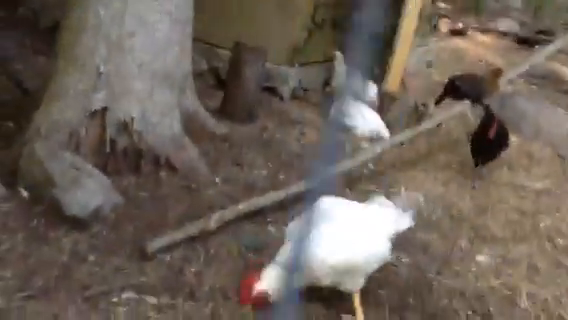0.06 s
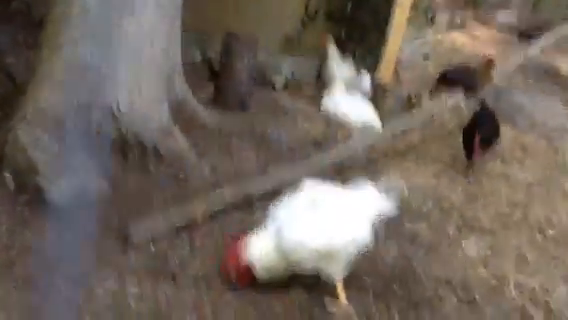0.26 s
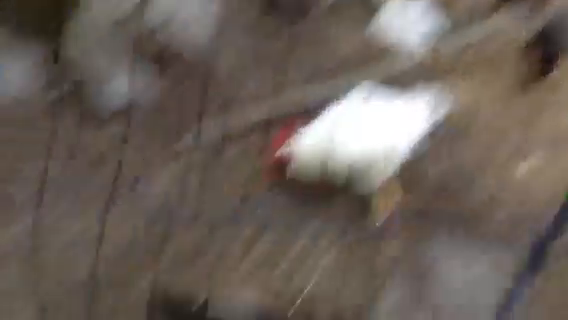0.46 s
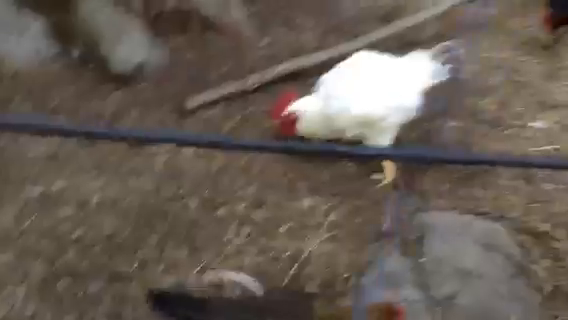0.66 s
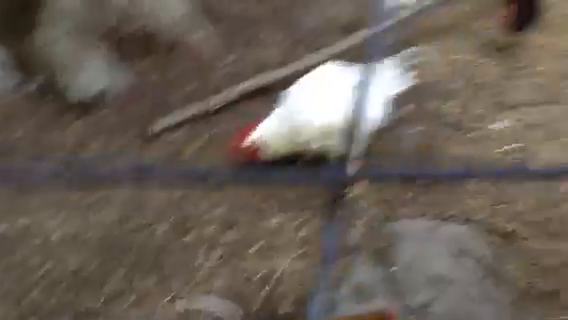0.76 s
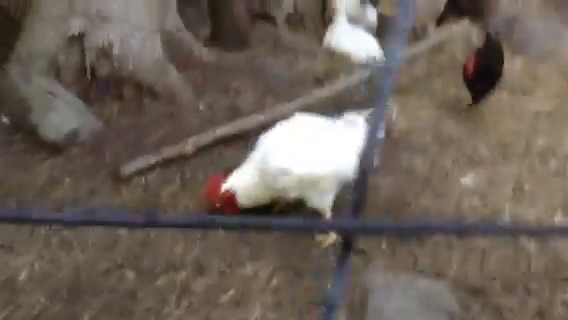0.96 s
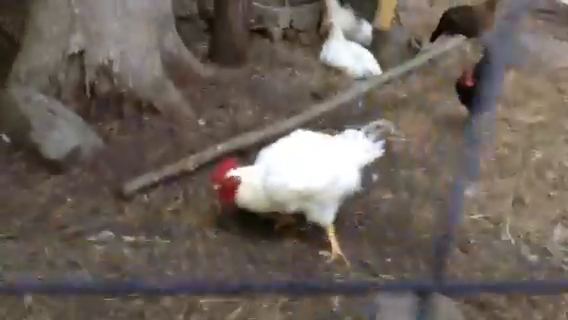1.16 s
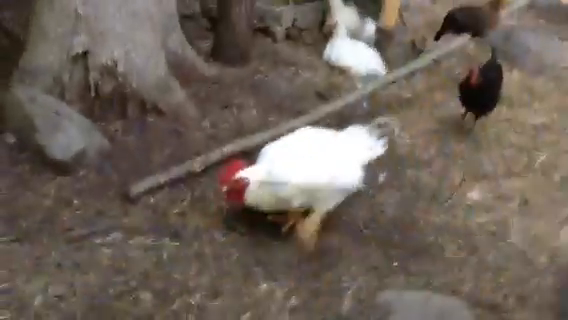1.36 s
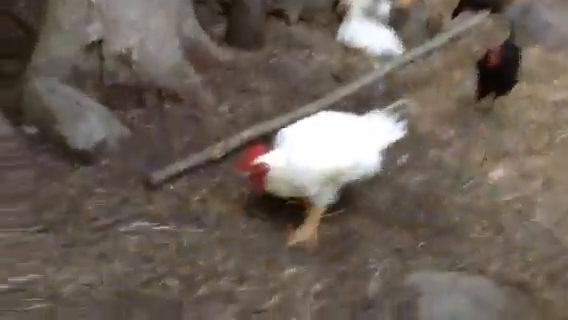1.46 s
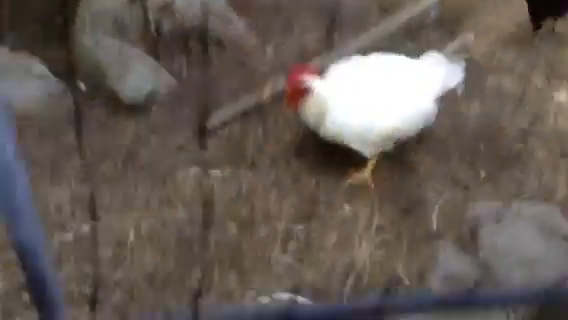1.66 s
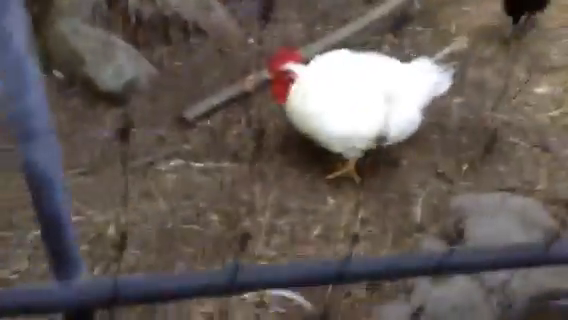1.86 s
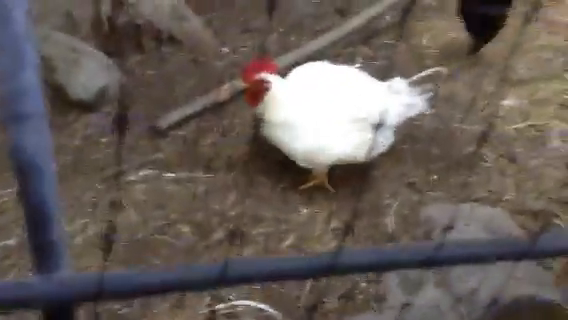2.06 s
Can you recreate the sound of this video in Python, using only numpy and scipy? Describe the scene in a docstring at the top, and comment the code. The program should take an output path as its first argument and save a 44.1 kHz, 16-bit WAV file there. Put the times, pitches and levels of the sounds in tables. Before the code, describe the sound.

Hens give short scattered clucks while feet scratch and rustle dry litter in a quiet yard

```python
"""Hens in an outdoor run: short clucks, loud and faint, are gliding sines with an octave, sometimes the
stronger, and a weak fourth partial; pulsed mouth resonances harden one onset. Feet scratching dry litter
are clumped grains over smooth noise, with ringing straw breaks; grit ticks as decaying band noise, twigs
and pecks as ringing clicks. A faint rough insect is narrow noise, a cricket's brief trill a wavering high
tone; coloured noise makes the quiet air of the yard, a noise-driven low resonance its wavering rumble."""
import sys
import numpy as np
from scipy import signal
from scipy.fft import rfft, irfft
from scipy.io import wavfile

SR = 44100
rng = np.random.default_rng(int(sys.argv[2]) if len(sys.argv) > 2 else 0)


def int16_out(signal):
    """Quantize to a 16-bit WAV file."""
    q = np.round(np.clip(np.atleast_2d(signal).T, -1, 1) * 32767)
    wavfile.write(sys.argv[1], SR, q.astype(np.int16))


def ratio(d):
    """dB to gain"""
    e = np.asarray(d, float) / 20
    return 10 ** e


N = 92610   # samples, 2.1 s

# Colour of the yard's air, relative density per hertz: [f/Hz, level/dB]
AIR_SPECTRUM = [(15, -58), (25, -27), (255, -2), (425, -2), (461, -2), (1280, -12), (3880, -12.5),
                (4820, -15.5), (6310, -16), (13400, -17), (15800, -17)]
# Course of the low rumble: [t/s, level/dB]
RUMBLE_LEVELS = [(0.0, -72), (0.18, -79), (0.33, -82), (0.6, -68), (1.33, -76), (1.45, -60.5),
                 (1.73, -65.5), (1.88, -71.5), (2.1, -62)]
# Swells of the litter rustle: [t/s, treble level/dB, upper-middle level/dB, middle level/dB]
RUSTLE_LEVELS = [(0.0, -65, -66, -66.5), (0.11, -60, -62, -61), (0.149, -49, -49, -52),
                 (0.26, -52.5, -60.5, -65), (0.3, -54, -56, -61.5), (0.33, -49, -63, -56.5),
                 (0.34, -53, -61, -61), (0.45, -52, -58.5, -57.5), (0.53, -54.5, -58.5, -62),
                 (0.54, -54, -63, -48), (0.55, -58, -61, -59.5), (0.58, -49.5, -55.5, -62),
                 (0.62, -47.5, -54, -63), (0.81, -64, -64, -66), (0.92, -54.5, -60, -72),
                 (0.949, -47, -56, -58), (0.959, -40.5, -47.5, -50), (0.978, -47, -49, -65.5),
                 (1.018, -39, -45.5, -49), (1.05, -47.5, -54.5, -57), (1.09, -48.5, -53, -62.5),
                 (1.12, -56, -61.5, -64.5), (1.4, -56.5, -62, -60), (1.56, -60, -57.5, -69.5),
                 (1.58, -53.5, -58.5, -61.5), (1.73, -67, -70.5, -69.5), (2.01, -72, -76, -66.5),
                 (2.1, -56, -60, -64)]
# Colours of the three rustle ranges, relative density per hertz: [f/Hz, level/dB]
TREBLE_SPECTRUM = [(6000, -22), (8000, -12), (10000, -3), (13000, 2), (15500, -2)]
UPPER_SPECTRUM = [(2800, -5.5), (4000, -1), (6000, -1), (8000, 0), (10500, -5.5)]
MIDDLE_SPECTRUM = [(250, -5), (500, -0.5), (1000, -1), (2000, -2), (3600, -8.5), (5500, -46)]
# Ticks of grit, peak levels before the band trim:
# [t/s, treble level/dB, upper-middle level/dB, middle level/dB, t60/s]
GRIT_TICKS = [(0.0812, -39, -64, -58, 0.013), (0.153, -50, -59, -52, 0.0084), (0.208, -47, -43, -61, 0.012),
              (0.2345, -32, -59, -44, 0.0084), (0.2798, -32, -61, -45, 0.0079),
              (0.3231, -25.5, -50, -38.5, 0.019), (0.372, -40, -60, -57, 0.0065),
              (0.4442, -32.5, -55, -52, 0.009), (0.4646, -48, -58, -40, 0.023),
              (0.6535, -31, -59, -46, 0.017), (0.871, -39.5, -60, -69, 0.011),
              (0.9448, -27.5, -52, -46, 0.018), (0.9634, -31, -63, -63, 0.012),
              (0.9704, -32, -51, -55, 0.02), (1.0206, -30, -38.5, -56, 0.014), (1.04, -49, -57, -47, 0.011),
              (1.0844, -30, -46, -50, 0.0047), (1.1995, -42, -61, -62, 0.0069),
              (1.276, -37, -56, -67, 0.0098), (1.298, -46, -49, -64, 0.014),
              (1.3054, -42, -46.5, -59, 0.011), (1.376, -36.5, -53, -55, 0.032),
              (1.5713, -33.5, -61, -62, 0.016)]
# Pass bands of the grit ticks: [low f/Hz, high f/Hz, trim level/dB]
GRIT_BANDS = [(9400, 17700, -2), (4050, 19800, 7.5), (1000, 5700, -1)]
# Snaps of twigs and pecks: [t/s, peak level/dB, ring f/Hz, t60/s]
TWIG_SNAPS = [(.025, -45.5, 640, 0.018), (0.152, -40.5, 5070, 0.0056), (.25, -43.5, 1000, 0.011),
              (.324, -41.5, 3780, 0.0095), (0.2815, -21.5, 13200, 0.0029), (0.948, -42, 560, 0.023),
              (1.06, -32, 11900, 0.0018), (1.076, -31, 11700, 0.0022), (1.0885, -31, 14000, .002),
              (1.1265, -35, 10000, .002), (1.161, -43, 11000, .003), (1.2115, -39, 11200, .003),
              (1.2185, -36, 11100, .002), (1.2355, -37, 11800, .002), (1.25, -36, 12500, .002),
              (1.2535, -43, 9700, .003), (0.957, -39, 2930, 0.0047), (0.9634, -38, 5070, 0.0049),
              (0.9649, -31.5, 2770, 0.013), (.965, -46, 530, 0.02), (1.02, -43, 547, 0.034),
              (1.042, -48.5, 1500, 0.015), (1.218, -45, 6200, 0.0053), (1.226, -43.5, 890, 0.0036),
              (1.235, -42.5, 6200, 0.0066), (1.309, -39.5, 695, 0.0063), (1.435, -46.5, 1410, 0.012),
              (1.499, -44.5, 446, 0.0057), (1.5397, -39.5, 3340, 0.0053), (1.538, -41.5, 2500, 0.005),
              (1.446, -46.5, 1700, 0.013), (1.452, -47.5, 1390, 0.0085), (1.5722, -44.5, 3230, 0.011),
              (1.571, -40, 9070, 0.0087), (1.572, -42, 14200, .006), (1.571, -49, 11800, .005),
              (1.597, -38, 6200, 0.0025)]
# Glides of the clucks, before wobble and flutter; some clucks are two successive or overlapping glides:
# [t/s, fundamental f/Hz, fundamental level/dB, octave level/dB]
CLUCK_GLIDES = [
    [(.128, 287, -44, -71), (.132, 332, -39, -50), (.137, 421, -46.5, -60), (.144, 402, -51, -51),
     (.153, 430, -59, -52)],
    [(.16, 1350, -55, -80), (.165, 1293, -44, -54), (.169, 972, -35.5, -49), (.173, 572, -32, -61),
     (.1765, 452, -23.5, -42), (.179, 402, -26, -40), (.182, 352, -40, -42), (.186, 303, -68, -63),
     (.19, 415, -41, -41), (.197, 400, -59, -54), (.205, 380, -48, -58), (.216, 350, -56, -62)],
    [(.5362, 1040, -47, -62), (.5372, 1020, -53, -33.5), (.5385, 1036, -30.5, -37), (.5394, 1150, -22, -44),
     (.5402, 876, -39.5, -70), (.5409, 460, -37, -56), (.542, 299, -32, -36), (.544, 295, -37.5, -66),
     (.549, 224, -61, -40), (.552, 220, -70, -72)],
    [(.836, 520, -77, -80), (.84, 523, -46.5, -86), (.846, 517, -59, -80)],
    [(.888, 323, -56, -55), (.891, 312, -38, -45), (.896, 344, -32.5, -39), (.901, 405, -35, -60),
     (.905, 423, -40, -47), (.908, 360, -54, -42), (.912, 375, -41, -40), (.918, 450, -44, -68)],
    [(.91, 1110, -54, -83), (.915, 1225, -45, -80), (.922, 1342, -45.5, -77), (.928, 1220, -37.5, -67),
     (.932, 955, -40, -48), (.935, 616, -29, -56), (.9375, 567, -23, -52), (.941, 360, -33.5, -45),
     (.945, 332, -50, -55), (.95, 330, -79, -72)],
    [(1.161, 343, -76, -54), (1.166, 324, -73, -41), (1.171, 295, -63, -33), (1.174, 349, -39.5, -40),
     (1.177, 298, -47, -36), (1.18, 328, -61, -36), (1.186, 320, -44, -33.5), (1.192, 280, -52, -36.5),
     (1.195, 284, -58, -48), (1.204, 303, -62, -50)],
    [(1.168, 485, -55, -80), (1.178, 425, -47.5, -67), (1.194, 414, -45.5, -79)],
    [(1.955, 398, -65, -88), (1.97, 320, -59.5, -81), (1.982, 333, -54.5, -83), (1.996, 365, -61, -73)],
    [(2.078, 281, -53, -78), (2.088, 278, -57, -72), (2.1, 267, -45.5, -61)],
]
# Pulses at the onset of the sharp cluck: [t/s, level/dB]
BEAK_PULSES = [(.5366, -33), (.5376, -32)]
# Resonances of the short mouth, relative to the pulses: [f/Hz, level/dB, t60/s]
MOUTH_RESONANCES = [(2060, -9, 0.0037), (2930, -1.5, .003), (3680, -2, 0.0048), (6200, -7, 0.0014)]
# Notes of the cricket, levels before the waver: [start t/s, length t/s, level/dB]
CRICKET_NOTES = [(1.602, 0.045, -65), (1.64, 0.015, -61), (1.658, 0.028, -62), (1.684, 0.02, -56.5),
                 (1.708, .05, -65.5), (1.76, 0.074, -68), (1.85, 0.022, -66)]


def in_time(rows):
    """Linear interpolation: the columns of a timed curve at every sample."""
    s, *columns = np.transpose(rows)
    return [np.interp(np.arange(N) / SR, s, column) for column in columns]


def rms_one(x):
    """Normalization: a signal scaled to rms 1."""
    return x / np.sqrt(np.mean(x ** 2) + 1e-20)


def drift(rate_hz):
    """Random modulation: white noise through a two-pole low-pass, scaled to rms 1."""
    pole = np.exp(-2 * np.pi * rate_hz / SR)
    noise = rng.standard_normal(N + SR)
    slow = signal.lfilter([1], [1, -2 * pole, pole * pole], noise)
    return rms_one(slow[SR:])   # the first second lets the filter settle


def ring(clicks, hz, t60):
    """Damped resonance: a unit click starts a decaying sine of initial height 1."""
    r = ratio(-60 / (t60 * SR))
    w = 2 * np.pi * hz / SR
    return signal.lfilter([0, np.sin(w)], [1, -2 * r * np.cos(w), r * r], clicks)


def colour(x, spectrum):
    """Spectral shaping: a white signal weighted on a logarithmic frequency axis, then set to rms 1."""
    hz, db = np.transpose(spectrum)
    log_f = np.log(np.fft.rfftfreq(N, 1 / SR) + 1)
    return rms_one(irfft(rfft(x) * ratio(np.interp(log_f, np.log(hz), db)), N))


def yard_air():
    """Broadband ambient noise: a fixed colour whose level wavers slowly."""
    level_db = -59.5 + 0.46 * drift(7.5)
    return ratio(level_db) * colour(rng.standard_normal(N), AIR_SPECTRUM)


def low_rumble():
    """Noise-driven resonance: a damped low mode under a random, wavering level."""
    rumble_hz, swing_db, t60_s = 145, 3.5, 0.015
    level_db = in_time(RUMBLE_LEVELS)[0] + swing_db * drift(8.2)
    return ratio(level_db) * rms_one(ring(rng.standard_normal(N), rumble_hz, t60_s))


def litter():
    """Granular friction: random impulses and smooth noise clump together in three frequency ranges."""
    grains_per_s, grain_spread_db, smooth_share, clump_db = 3000, 4.5, 0.75, 2
    out, clump = 0, ratio(clump_db * drift(40))
    spectra = [TREBLE_SPECTRUM, UPPER_SPECTRUM, MIDDLE_SPECTRUM]
    for db, spectrum in zip(in_time(RUSTLE_LEVELS), spectra):
        sizes = ratio(grain_spread_db * np.minimum(rng.exponential(1, N), 5))
        signed = sizes * rng.choice([-1, 1], N)
        grains = rms_one(signed * (rng.random(N) < grains_per_s * clump / SR))
        swish = clump * rng.standard_normal(N)
        # the shares are of power
        source = np.sqrt(1 - smooth_share) * grains + np.sqrt(smooth_share) * swish
        out = out + ratio(db) * colour(source, spectrum)
    return out


def straw_crackle():
    """Random fracture: sparse straw breaks ring high and brief, under the treble rustle's swells."""
    crackles_per_s, below_treble_db, t60_s = 320, -8, 0.0042
    sizes = ratio(2.9 * np.minimum(rng.exponential(1, N), 3))
    breaks = sizes * (rng.random(N) < crackles_per_s / SR)
    dealt = rng.integers(0, 8, N)   # each break takes one of eight pitches
    rings = 0
    for k, hz in enumerate(np.geomspace(9000, 14500, 8)):
        own_breaks = breaks * (dealt == k) + 1e-18   # tiny offset avoids denormal numbers
        rings = rings + ring(own_breaks, hz, t60_s)
    return ratio(in_time(RUSTLE_LEVELS)[0] + below_treble_db) * rms_one(rings)


def snap(size, hz, t60, draws):
    """Impulse excitation: one hard click and up to four weaker within 2 ms ring a resonance; peak 1."""
    clicks = np.zeros(size)
    clicks[(draws[:4] * .002 * SR).astype(int)] = draws[4:] - .5
    clicks[0] = 1
    sound = ring(clicks, hz, t60)
    return sound / np.abs(sound).max()


def twigs():
    """Impulsive radiation: the snaps of twigs and pecks, each a damped resonance."""
    out, size = np.zeros(N + SR), 2000
    for s, db, hz, t60 in TWIG_SNAPS:
        out[int(s * SR):][:size] += ratio(db) * snap(size, hz, t60, rng.random(8))
    return out[:N]


def burst(band, t60, size):
    """Transient noise: band noise with an abrupt start and exponential decay; peak 1."""
    noise = rng.standard_normal(size) * ratio(-60 * np.arange(size) / (t60 * SR))
    sound = signal.sosfilt(band, noise)
    return sound / np.abs(sound).max()


def grit():
    """Broadband impact: each tick is the sum of decaying noise bursts in three bands."""
    out, size = np.zeros(N + SR), 2000
    bands = [signal.butter(2, [low, high], "band", fs=SR, output="sos") for low, high, _ in GRIT_BANDS]
    for s, *levels, t60 in GRIT_TICKS:
        for band, db, (*_, trim_db) in zip(bands, levels, GRIT_BANDS):
            out[int(s * SR):][:size] += ratio(db + trim_db) * burst(band, t60, size)
    return out[:N]


def hens():
    """Harmonic phonation: gliding tones with second and fourth partials, fluttering and rough with breath."""
    pitch_jitter, fourth_below_octave_db, flutter_db, breath_share = 0.021, -22.5, .7, .11
    out, t = np.zeros(N), np.arange(N) / SR
    wobble = 1 + pitch_jitter * drift(55)
    for rows in CLUCK_GLIDES:
        hz, low_db, octave_db = in_time(rows)
        on = (t >= rows[0][0]) & (t <= rows[-1][0])
        phase = 2 * np.pi * np.cumsum(hz * wobble * on) / SR
        fundamental = ratio(low_db) * np.sin(phase)
        upper = np.sin(2 * phase) + ratio(fourth_below_octave_db) * np.sin(4 * phase)
        out += on * (fundamental + ratio(octave_db) * upper)
    return out * (ratio(flutter_db * drift(100)) + breath_share * drift(480))


def beak():
    """Formant excitation: two hard pulses ring the short mouth resonances."""
    clicks = np.zeros(N)
    for s, db in BEAK_PULSES:
        clicks[int(s * SR):][:3] = ratio(db) * np.array([.25, .5, .25])
    return sum(ratio(db) * ring(clicks, hz, t60) for hz, db, t60 in MOUTH_RESONANCES)


def far_insect():
    """Narrow-band noise: a noise-driven resonance, faint and rough, swells and fades."""
    hz, start_s, length_s, level_db, t60_s = 6520, 1.333, 0.17, -63.5, 0.0058
    progress = np.clip((np.arange(N) / SR - start_s) / length_s, 0, 1)
    swell = np.abs(np.sin(np.pi * progress)) ** .5
    return ratio(level_db) * swell * rms_one(ring(rng.standard_normal(N), hz, t60_s))


def cricket():
    """Frequency and amplitude modulation: a thin wavering tone in soft-edged notes climbs to its pitch."""
    final_hz, rise_hz, rise_start_s, rise_s = 4800, 110, 1.605, 0.031
    t = np.arange(N) / SR
    hz = final_hz - rise_hz * np.clip(1 - (t - rise_start_s) / rise_s, 0, 1)
    phase = 2 * np.pi * np.cumsum(hz + 15 * drift(36)) / SR
    level = np.zeros(N)
    for s, length, db in CRICKET_NOTES:
        arch = np.sin(np.pi * np.clip((t - s) / length, 0, 1))
        level += ratio(db) * np.sqrt(arch + 1e-12)
    return level * ratio(2.0 * drift(60)) * np.sin(phase)


def scene():
    """Superposition: the pressures of all sources in the yard add on one channel."""
    ground = litter() + straw_crackle() + twigs() + grit()
    animals = hens() + beak() + far_insect() + cricket()
    return (yard_air() + low_rumble() + ground + animals)[None]


def top_cut(x):
    """Nothing passes above the cut-off."""
    return signal.sosfilt(signal.butter(12, 16040, fs=SR, output="sos"), x)


def record(dry):
    """Band limitation: a small microphone without bass, then a steep fall to a shelf at the top."""
    bass_cut = signal.butter(4, 116.6, "high", fs=SR, output="sos")
    top_shelf = signal.ellip(8, .5, 36, 15300, fs=SR, output="sos")   # 0.5 dB ripple, 36 dB down
    mix = signal.sosfilt(top_shelf, signal.sosfilt(bass_cut, dry))
    return top_cut(mix)


dry = scene()
out = record(dry)
int16_out(out)
```